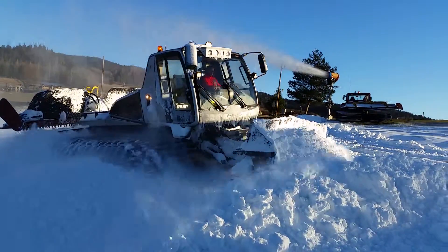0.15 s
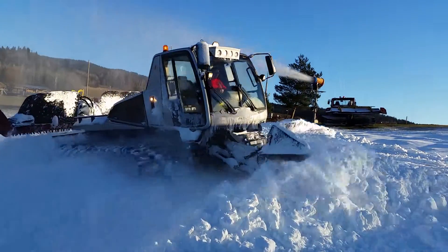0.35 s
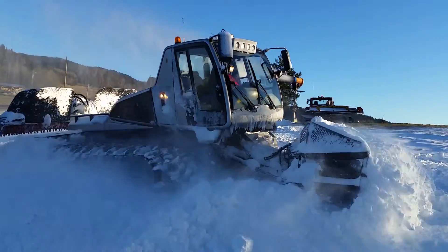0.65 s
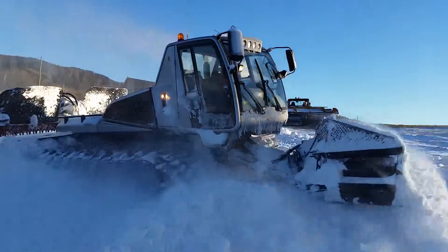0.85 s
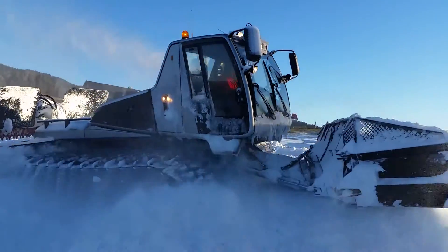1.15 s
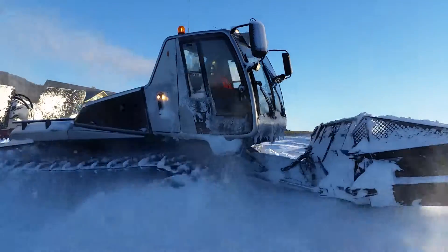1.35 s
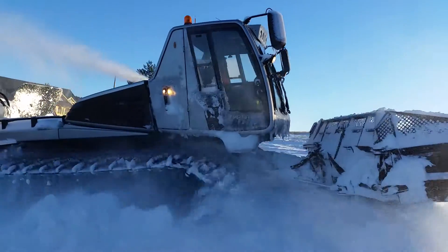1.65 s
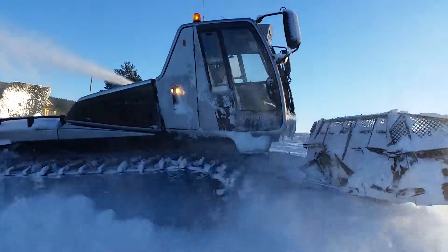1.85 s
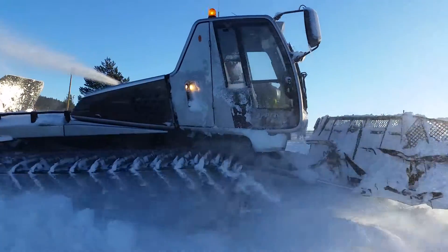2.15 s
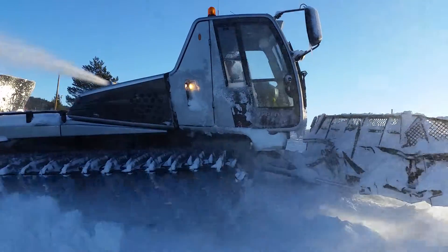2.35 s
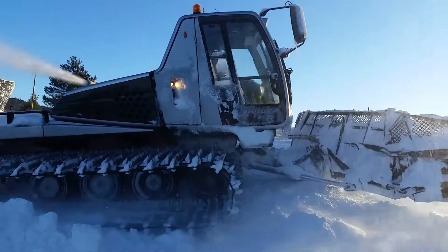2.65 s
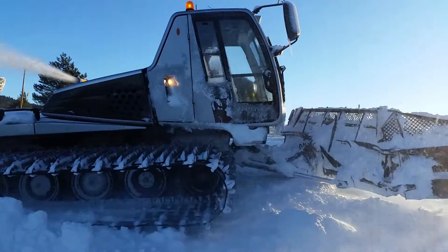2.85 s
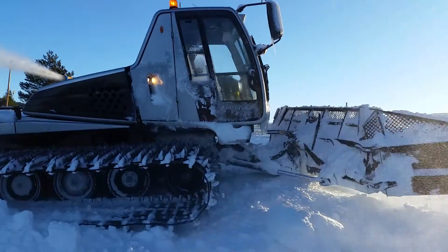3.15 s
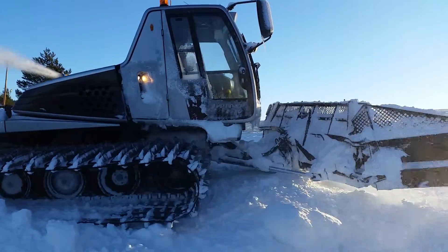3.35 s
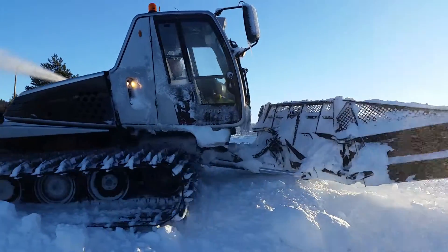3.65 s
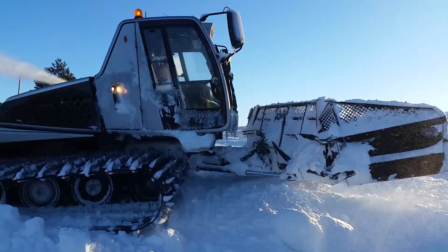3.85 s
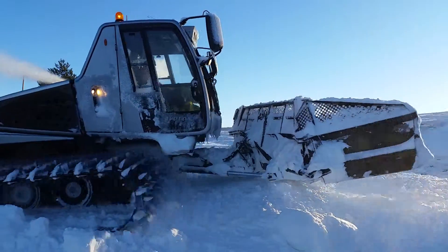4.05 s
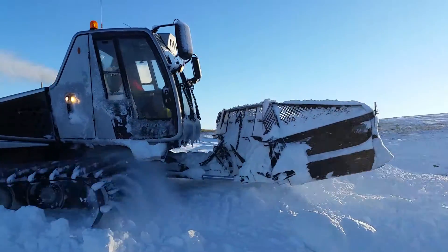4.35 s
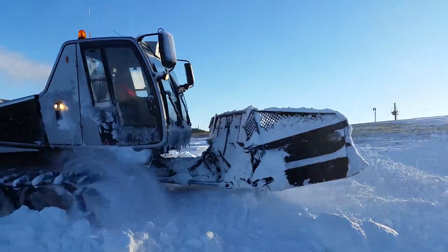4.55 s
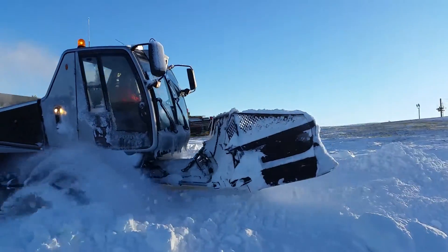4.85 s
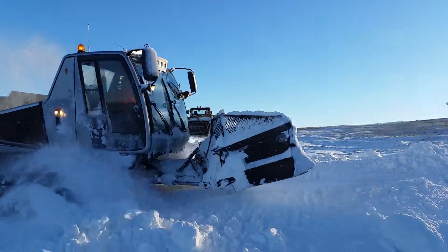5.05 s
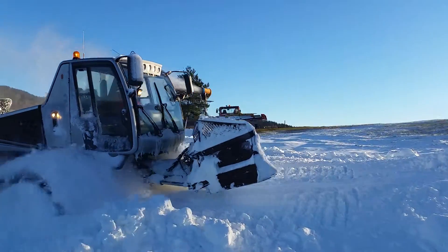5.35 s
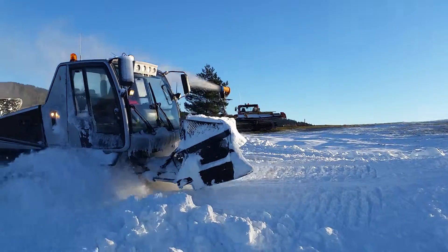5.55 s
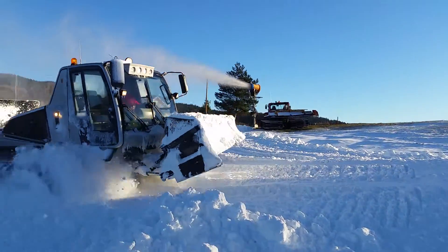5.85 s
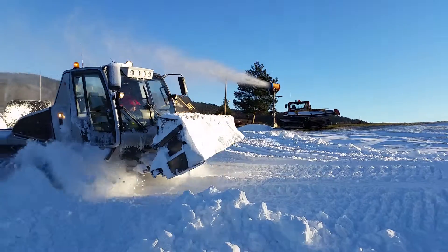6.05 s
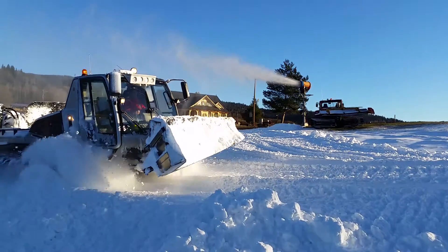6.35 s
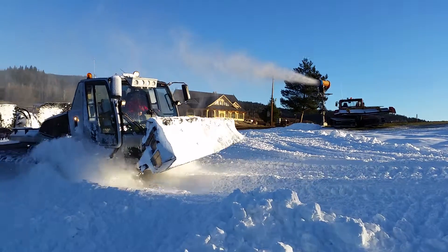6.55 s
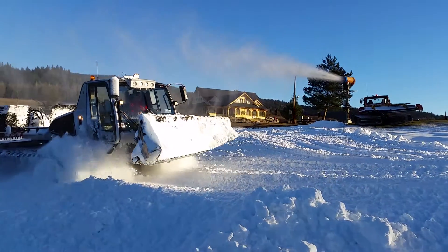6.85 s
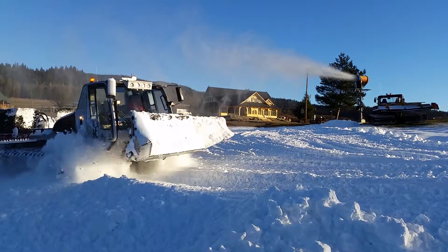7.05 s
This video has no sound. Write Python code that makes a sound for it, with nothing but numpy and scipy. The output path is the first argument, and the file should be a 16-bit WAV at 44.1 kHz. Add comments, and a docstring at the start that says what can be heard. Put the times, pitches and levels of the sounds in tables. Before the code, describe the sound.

A big diesel groomer swings past very near, clattering its tracks and throwing hissing snow. The engine bogs down, surges into one rising roar with whining pumps, then eases back. A brief quieter lull follows before the track noise returns brighter with crunching snow and squeaks. A distant snow gun drones in open air, and low wind bursts buffet and overload the unprotected stereo microphone.

```python
"""A snow groomer swings past close to the listener on a windy slope while a fan snow gun hums farther off.
Its six-cylinder diesel, a sum of firing orders and throbbing noise, sags, revs once and settles.
The turbo and pumps are tones; the steel tracks rattle as filtered noise, ring and squeak; thrown snow hisses.
Low-frequency noise buffets the two microphone ports as gusts, and the strongest make a limiter duck."""
import sys
import numpy as np
from scipy import signal
from scipy.fft import rfft, irfft
from scipy.io import wavfile
from scipy.ndimage import uniform_filter1d, map_coordinates

SR = 44100
rng = np.random.default_rng(int(sys.argv[2]) if len(sys.argv) > 2 else 0)


def wav_out(sig):
    """Save sig, one row per channel (or a flat mono array), as 16-bit PCM at SR to the path in sys.argv[1]."""
    wavfile.write(sys.argv[1], SR, np.round(np.clip(np.atleast_2d(sig).T, -1, 1) * 32767).astype(np.int16))


N = 316638
TIME = np.arange(N) / SR
BINS = np.fft.rfftfreq(N, 1 / SR)


def gain_of(db):
    """Level definition: decibels to an amplitude ratio."""
    return 10 ** (np.asarray(db) / 20)


def evened(x):
    """Energy normalisation: scales to rms 1."""
    return x / np.sqrt(np.mean(x ** 2) + 1e-20)


def read(points, hz):
    """Spectral interpolation on a log-frequency axis."""
    f, value = np.transpose(points)
    return np.interp(np.log(hz + 1), np.log(f + 1), value)


def played(rows):
    """Linear interpolation: each column of a curve table, sample by sample."""
    s, *columns = np.transpose(rows)
    return [np.interp(TIME, s, column) for column in columns]


def drift(rate_hz, size=16384):
    """Low-pass filtered noise: a smooth random curve of rms 1, varying up to about the given rate."""
    coarse = np.linspace(0, TIME[-1], size)
    rates = np.fft.rfftfreq(size, coarse[1])
    smooth = irfft(rfft(rng.standard_normal(size)) / (1 + (rates / rate_hz) ** 4))
    return np.interp(TIME, coarse, evened(smooth))


def panned(pan_db):
    """Interchannel level difference: left and right gains whose mean is 1."""
    sides = gain_of(np.array([[.5], [-.5]]) * pan_db)
    return sides / sides.mean(0)


def burst(s, length):
    """Gaussian envelope centred on s; its length is taken between the 1/e points."""
    return np.exp(-np.minimum((2 * (TIME - s) / length) ** 2, 20))


def noise():
    """Statistical independence: two unrelated white noises."""
    return rng.standard_normal((2, N))


def grains(per_s, spread_db):
    """Random impulse process: sparse clicks of uneven size on two channels."""
    size = gain_of(spread_db * np.minimum(rng.exponential(1, N), 4))
    return evened(noise() * size * (rng.random(N) < per_s / SR))


def tone(turns):
    """Phase accumulation: a sine of rms 1 from its count of cycles, with a random starting phase."""
    return np.sqrt(2) * np.sin(2 * np.pi * (turns + rng.random()))


def delayed(x, ms):
    """Propagation delay: shifts a signal later by a curve."""
    return map_coordinates(x, [np.arange(N) - ms * SR / 1000], order=5)


# Unlike responses of the two ports. Each row: frequency in Hz, left minus right in dB.
PORTS = [(60, -13), (140, 3.5), (300, 0), (600, 4), (1000, 5.5), (1400, 7.5), (1700, 9.5), (2300, 9.5),
         (2900, 8.5), (3650, 1), (4500, 5), (5600, 3), (6100, 5), (7300, 8.5), (8300, 29), (9000, 16.5),
         (9450, 28), (10200, 25), (11200, 6.5), (12500, 3.5), (15000, -4)]
# Likeness of the two ports' signals. Each row: frequency in Hz, left-right correlation (no unit).
LIKENESS = [(30, 0.45), (130, 1), (600, 0.69), (1000, 0.46), (1600, 0.76), (3000, 0.71), (6000, 0.065)]


def coloured(drive, spectrum):
    """Linear filtering with partial coherence: shapes a two-channel drive for both ports; mid rms 1."""
    a, b = rfft(drive)
    same = np.clip(read(LIKENESS, BINS), -1, 1)
    pair = np.array([a, same * a + np.sqrt(1 - same ** 2) * b])
    sides = panned(read(PORTS, BINS))
    mid = np.sqrt((sides ** 2).sum(0) + 2 * same * sides.prod(0))
    out = irfft(pair * sides / mid * gain_of(read(spectrum, BINS)), N)
    return out / np.std(out.mean(0))


# Loudness of the groomer, which engine, tracks and snow all follow.
# Each row: time in seconds, level in dB before each layer's own level, left minus right in dB.
MACHINE = [(0, -39, 8), (.1, -32.5, 3), (.35, -39.5, 9.5), (1.05, -37.5, 5), (1.5, -30, 5.5),
           (2.3, -30, 4.5), (3.3, -29, 7), (3.6, -30.5, 7), (4.1, -39, 3.5), (4.45, -38.5, 6),
           (4.85, -30.5, 5.5), (5.2, -30, 6), (5.9, -32, 1.5), (6.25, -33, 7), (6.85, -34, 5.5)]


def groomer_db(follow=1):
    """Common level envelope: a layer may follow the groomer's swings more or less strongly."""
    db = played(MACHINE)[0]
    return db.mean() + follow * (db - db.mean())


# Engine speed, sagging under the load, revving once and settling.
# Each row: time in seconds, firing rate in Hz.
ENGINE = [(0, 138.6), (.6, 135.5), (.95, 131.3), (1.4, 133.1), (1.65, 126), (2.15, 102), (2.28, 103),
          (2.45, 129.5), (2.7, 152), (3, 168.5), (3.3, 173.5), (3.6, 167.9), (3.9, 156), (4.3, 141),
          (5, 131.2), (5.6, 126.4), (6.3, 130.2), (7.18, 128.5)]


def crank(jitter=0.0031):
    """Frequency integration: the nominal firing rate, and the count of firings with slightly unsteady speed."""
    hz = played(ENGINE)[0]
    return hz, np.cumsum(hz * (1 + jitter * drift(17.2))) / SR


def high_revs(hz, cruise_hz=135, span_hz=35):
    """Linear speed scale: 0 at cruising speed, 1 at the top of the rev."""
    return np.clip((hz - cruise_hz) / span_hz, 0, 1)


# Orders of the exhaust before the pipe. Each row: multiple of the firing rate, relative level in dB.
EXHAUST = [(1, 0.5), (1.5, -16), (2, -6), (3, -7.5)]
# Resonances of pipe and silencer. Each row: frequency in Hz, gain in dB.
PIPE = [(100, -10), (118, -7), (129, 0), (141, -0.5), (156, 2), (163, 1), (172, -8), (200, -5.5),
        (260, -11), (520, -19)]
# The note grows by up to PULL_DB when the engine gains speed about this fast, after the turbo's lag.
PULL_DB, PULL_HZ_PER_S, BOOST_LAG_S = 5, 46, 0.25


def exhaust(hz, turns, level_db=9.5, follow=0.75, rough=0.13, thrum_db=-34):
    """Source-filter principle: firing orders sweep the pipe's resonances and swell when the engine pulls.

    The two manifold halves thrum an octave below the firing rate.
    """
    gaining = uniform_filter1d(np.gradient(hz) * SR, size=SR // 8)
    boost = np.interp(TIME - BOOST_LAG_S, TIME, np.maximum(gaining, 0))
    pull_db = PULL_DB * np.tanh(boost / PULL_HZ_PER_S)
    note = 0
    for k, db in EXHAUST:
        roughness = 1 + rough * drift(45)
        note = note + gain_of(db + read(PIPE, k * hz)) * tone(k * turns) * roughness
    thrum = gain_of(thrum_db) * tone(turns / 2) * (1 + 0.42 * drift(9.2))
    return (gain_of(groomer_db(follow) + level_db + pull_db) * note + thrum) * panned(-0.9)


# Spectrum of the combustion noise. Each row: frequency in Hz, relative level in dB.
ROAR = [(10, -45), (28, -7), (48, 3.5), (80, 1), (140, 7), (230, -0.5), (350, -2.5), (500, -0.5), (690, -4),
        (820, -9), (1100, -13.5), (2500, -56)]
# Spectrum of the intake roar. Each row: frequency in Hz, relative level in dB.
INTAKE = [(200, -36), (520, -6), (680, 12), (770, 2.5), (860, -29), (1400, -39)]


def engine_bay(hz, turns, roar_db=8, intake_db=2.5, orders_db=-4, knock=0.19, follow=0.84):
    """Amplitude modulation: combustion noise throbs with the firing and the intake roars at high revs.

    Unequal cylinders fill in the orders at sixths of the firing rate.
    """
    throb = 1 + knock * np.cos(2 * np.pi * turns)
    combustion = gain_of(roar_db) * coloured(noise() * throb, ROAR)
    intake = gain_of(intake_db) * high_revs(hz) * coloured(noise() * throb, INTAKE)
    orders = evened(sum(tone(k / 6 * turns) * (1 + .6 * drift(6)) / np.sqrt(k) for k in range(10, 66)))
    return gain_of(groomer_db(follow)) * (combustion + intake + gain_of(orders_db) * orders * panned(2.9))


# Gears and hydraulic pumps. Each row: multiple of the firing rate, relative level in dB when cruising,
# relative level in dB at full revs.
WHINES = [(2.31, -10, -4), (3.12, -11.5, -31), (4, -14, -7.5), (4.6, -8.5, -11)]


def pumps(hz, turns, level_db=2.5, follow=0.8, waver=0.26):
    """Meshing orders: gears and hydraulic pumps whine at fixed multiples of the firing rate."""
    revs = high_revs(hz)
    whine = 0
    for k, cruise_db, full_db in WHINES:
        db = cruise_db + revs * (full_db - cruise_db)
        whine = whine + gain_of(db) * tone(k * turns) * (1 + waver * drift(13))
    return whine * gain_of(groomer_db(follow) + level_db) * panned(3.8)


# The turbo runs down, then spools up a little with the rev.
# Each row: time in seconds, mean whistle frequency in Hz, relative level in dB.
TURBO = [(0, 10540, -47), (1, 10140, -46), (1.3, 9940, -35), (1.47, 9730, -41), (1.67, 9150, -34),
         (1.82, 8500, -31.5), (1.95, 7800, -46), (2.29, 6652, -54), (2.55, 7100, -53), (2.75, 7493, -50),
         (3.3, 7170, -49), (3.7, 7040, -80)]


def turbo(level_db=-1.0, waver=0.006, fuzz=0.97):
    """Narrow-band modulation: a whistle, fuzzy with random sidebands, sinks as the boost falls away."""
    hz, db = played(TURBO)
    turns = np.cumsum(hz * (1 + waver * drift(156))) / SR
    sidebands = drift(150) * tone(turns) + drift(60) * tone(turns)
    whistle = evened(tone(turns) + fuzz * sidebands)
    return whistle * gain_of(db + level_db) * panned(20)


# Rattle with the flank facing the listener. Each row: frequency in Hz, relative level in dB.
RATTLE_FLANK = [(480, -11), (820, -1.5), (893, -29), (964, 4), (1040, -3.5), (1190, 1.5), (1450, -6),
                (1680, 0), (2010, -11), (2620, -15), (2970, -13.5), (3800, -9.5), (4600, -15),
                (5680, -28.5), (8000, -18.5), (10400, -53), (17600, -120)]
# Rattle with the blade facing the listener. Each row: frequency in Hz, relative level in dB.
RATTLE_FRONT = [(480, -25), (820, -17), (960, -6.5), (1150, -0.5), (1350, 0), (1500, -2), (1780, -1.5),
                (2300, -5.5), (2700, -15.5), (3150, -14.5), (3650, -13), (4700, -15.5), (5500, -19),
                (6500, -28), (8000, -16), (10400, -48)]
# Turning of the groomer. Each row: time in seconds, share of the flank from 0 to 1.
HEADING = [(0, 0.25), (.8, 0.8), (1.5, 0.86), (3.5, 1), (4.5, 0.03), (7.18, 0.05)]


def tracks(turns, level_db=-0.16, clink=0.41, knock=0.069, shake_db=0.97, cleat_hz=22.84, slap=0.1):
    """Directivity: chain clinks and injector clatter change colour with heading and swell with each cleat."""
    rattle_db, pan_db = played(MACHINE)
    flank = np.clip(played(HEADING)[0], 0, 1)
    cleat_turns = np.cumsum(cleat_hz * (1 + 0.059 * drift(1.62))) / SR
    cleats = 1 + slap * np.cos(2 * np.pi * cleat_turns)
    clatter = 1 + knock * np.cos(2 * np.pi * turns)
    drive = (noise() + clink * grains(900, 2.8)) * clatter * cleats
    rattle = flank * coloured(drive, RATTLE_FLANK) + (1 - flank) * coloured(drive, RATTLE_FRONT)
    # only the pan's swings about its mean are applied
    return rattle * gain_of(rattle_db + level_db + shake_db * drift(11.6)) * panned(pan_db - pan_db.mean())


# Ringing of the cleats and wheels.
# Each row: frequency in Hz, relative level in dB, time to decay by 60 dB in seconds.
STEEL = [(1127, -3, 0.022), (1318, -5.5, 0.036), (1626, 1.5, 0.042), (1797, 0, 0.055), (2026, -2.5, 0.032),
         (2287, -6, 0.019), (3697, -8, 0.05), (4680, -17, .02)]


def clanks(level_db=-6, per_s=260):
    """Modal synthesis: cleats and wheels knock together and their steel modes ring briefly."""
    t = np.arange(SR // 10) / SR
    rings = np.zeros((2, N))
    for hz, db, t60 in STEEL:
        ring = evened(gain_of(-60 * t / t60) * np.sin(2 * np.pi * hz * t))
        rings += gain_of(db) * signal.oaconvolve(grains(per_s, 0.53), ring[None], axes=1)[:, :N]
    return evened(rings) * gain_of(groomer_db() + level_db) * panned(3.6)


# Squeaks of the steel track links.
# Each row: centre in seconds, length in seconds, mean pitch in Hz, level in dB.
SQUEAKS = [(2.369, 0.034, 10050, -34), (4.56, 0.029, 9080, -40), (4.62, .03, 9050, -42),
           (4.716, .05, 9000, -40), (4.941, .03, 8400, -39), (4.981, .03, 9030, -37),
           (5.34, 0.062, 8800, -37), (5.71, 0.036, 9000, -38), (5.79, 0.02, 9700, -32)]
# The links scrape as the tracks skid through the turn: centre, length, mean pitch and central level.
SKID_S, SKID_LENGTH_S, SKID_HZ, SKID_DB = 4.9, 0.85, 8850, -43.5


def squeaks(rasp_hz=170, scrape_hz=380, stutter_db=3):
    """Frictional squeal: short frequency-modulated cries of cold steel over a stuttering scrape."""
    sound = sum(gain_of(db) * burst(s, length) * np.sin(2 * np.pi * hz * TIME)
                for s, length, hz, db in SQUEAKS)
    rasp = np.exp(2j * np.pi * np.cumsum(rasp_hz * drift(388)) / SR)
    squeals = np.sqrt(2) * (signal.hilbert(sound) * rasp).real
    scrape = drift(300) * tone(np.cumsum(SKID_HZ + scrape_hz * drift(299)) / SR)
    scrape = scrape * burst(SKID_S, SKID_LENGTH_S) * gain_of(SKID_DB + stutter_db * drift(25))
    return (squeals + scrape) * panned(23)


# Spectrum of the powder hiss. Each row: frequency in Hz, relative level in dB.
POWDER = [(6000, -50), (9000, -7), (11000, -8.5), (12500, -2), (15000, 3), (16000, 1)]
# Crunch of snow under the cleats. Each row: frequency in Hz, relative level in dB.
CRYSTALS = [(2800, -18), (4000, -8.5), (5600, -13), (7500, -13), (8600, 0), (9400, -0.5), (10000, -1),
            (11200, -5), (13000, -6), (16000, -30)]
# Spectrum of a bursting clod. Each row: frequency in Hz, relative level in dB.
CLOD = [(500, -8), (2000, 9), (3000, -11), (6000, 4), (9000, 5), (15000, -7)]
# Clods of snow bursting on the tracks. Each row: centre in seconds, peak level in dB.
CLODS = [(4.935, -41), (5.03, -33), (5.075, -37), (5.125, -36), (5.31, -36)]
# Plumes of powder thrown up by the tracks.
# Each row: centre in seconds, length in seconds, relative level in dB, left minus right in dB.
PLUMES = [(.08, .12, -36, -2), (2.42, 0.55, -30, 2), (3.33, .08, -29, 14), (5.45, 0.32, -35, -1),
          (6.49, 0.43, -27, -5), (7.05, 0.23, -35, -13)]
# Late in the turn the hiss also bounces off the snow.
# Each row: time in seconds, delay in milliseconds, strength as an amplitude ratio.
BOUNCE = [(4.7, .25, 0), (5.45, .287, 0.02), (6.1, 0.31, 0.046), (6.6, 0.3, 0.12), (7.18, 0.36, 0.098)]


def snow(spray_db=-2.5, spray_follow=0.75, plume_db=-1.0, front_pan_db=-1.0, flank_pan_db=1.5,
         crunch_db=-7.0, crunch_follow=1.07, clump_db=0.8, billow_db=1.5, grit=0.14):
    """Granular noise and comb filtering: powder hisses, crystals crunch and clods burst, with a late echo."""
    delay_ms, strength = played(BOUNCE)
    pan_db = front_pan_db + (flank_pan_db - front_pan_db) * played(HEADING)[0]
    steady = gain_of(groomer_db(spray_follow) + spray_db) * panned(pan_db)
    plumes = sum(gain_of(db + plume_db) * burst(s, length) * panned(pan) for s, length, db, pan in PLUMES)
    powder = coloured(noise() + grit * grains(2500, 2.5), POWDER) * np.hypot(steady, plumes)
    crunch = coloured(noise() + grit * grains(1200, 3), CRYSTALS)
    crunch = crunch * gain_of(groomer_db(crunch_follow) + crunch_db)
    clods = coloured(noise(), CLOD) * sum(gain_of(db) * burst(s, 0.03) for s, db in CLODS)
    billowing = gain_of(billow_db * drift(7)) * powder + gain_of(billow_db * drift(15)) * crunch
    hiss = gain_of(clump_db * drift(40)) * billowing
    echo = strength * np.array([delayed(side, delay_ms) for side in hiss])
    return hiss + echo + clods


# Blade tone of the snow gun, fading around 4.3 seconds and then returning stronger.
# Each row: time in seconds, relative level in dB, left minus right in dB.
FAN = [(0, -32, 12), (1, -34, 13), (1.42, -28, 8), (2.4, -27.5, 6), (3.1, -31, -1), (3.6, -30.5, 1),
       (4.3, -38, 4), (5.1, -27.5, 3), (6, -27.5, 9.5), (6.85, -25.5, 9.5)]
# Motor and compressor of the snow gun. Each row: mean frequency in Hz, mean level in dB.
HUMS = [(404, -44), (939, -52), (990.5, -52.5), (1323, -51.5), (8600, -63), (9949, -66)]
FAN_HZ, BEAT_HZ = 745.1, 10.5  # mean blade tone, and how far below it a weaker tone beats against it


def snow_gun(blade_db=-1, beat_db=-11, flicker_db=0.63):
    """Beating: two close blade tones interfere above steady hums, all wavering in the moving air."""
    db, pan_db = played(FAN)
    clock = np.cumsum(1 + .0008 * drift(8)) / SR
    blades = tone(FAN_HZ * clock) + gain_of(beat_db) * tone((FAN_HZ - BEAT_HZ) * clock)
    hums = sum(tone(hz * clock) * gain_of(hum_db + 2 * drift(0.58)) * panned(read(PORTS, hz))
               for hz, hum_db in HUMS)
    return blades * gain_of(db + blade_db + flicker_db * drift(10)) * panned(pan_db) + hums


# The breeze, with a lull after the rev.
# Each row: time in seconds, relative rumble level in dB, left minus right in dB.
WIND = [(0, -19, -2), (.4, -23.5, -4), (.65, -26, 3), (1, -28.5, -2), (1.5, -21.5, 2), (2.2, -24, -3),
        (2.8, -20.5, -4), (3.25, -25.5, 10), (3.9, -27.5, 10), (4.1, -41, 14), (4.5, -40, 0),
        (5.05, -21.5, 2), (5.8, -19.5, -3.5), (6.35, -23, -2), (7.18, -21, 0)]
# Spectrum of the rumble. Each row: frequency in Hz, relative level in dB.
RUMBLE = [(8, -45), (18, -15), (28, -14), (45, -8), (65, 0.5), (85, -2.5), (120, -2.5), (200, -8.5),
          (400, -23), (1000, -54), (3000, -92)]
# Sharp gusts, mostly on one port. Each row: centre in seconds, length in seconds,
# relative rumble level in dB, relative flutter level in dB, left minus right in dB.
GUSTS = [(.02, 0.052, -24, -16.5, -7), (0.178, 0.082, -10.5, -14.5, -11), (0.27, 0.095, -28, -13, -10),
         (2.11, 0.035, -15.5, -21, 12), (2.871, 0.082, -15, -15, 6), (3.068, 0.086, -28, -14.5, 28),
         (3.399, 0.14, -18.5, -20, 14), (3.65, 0.089, -17.5, -27, 27), (3.79, 0.032, -12, -13.5, 3.5),
         (3.84, 0.076, -21, -21, 26), (5.62, 0.11, -21.5, -26, -10), (5.882, 0.068, -19.5, -17, -13),
         (5.964, 0.036, -19, -11, -3), (6.036, 0.043, -12, -25, 6), (6.13, 0.05, -16.5, -20.5, 16),
         (6.967, 0.086, -11.5, -25, -25), (7.044, 0.12, -18, -16.5, -8)]
# Spectrum of the flutter. Each row: frequency in Hz, relative level in dB.
FLUTTER = [(10, -50), (40, -29), (100, -2), (200, 4), (350, -3.5), (600, -14), (1500, -51), (4000, -70)]


def wind(level_db=3, gust_db=0, flutter_db=0, shared=0.12, eddy_hz=22, chop=0.32, swell_db=0.74):
    """Turbulent pressure: eddies puff on two ports, partly together; sharp gusts reach higher in pitch."""
    db, pan_db = played(WIND)
    rumble, flutter = (evened(irfft(rfft(noise()) * gain_of(read(shape, BINS)), N))
                       for shape in (RUMBLE, FLUTTER))
    rumble = rumble + shared * rumble[::-1]  # each port also hears a little of the other
    rumble = rumble / np.sqrt(uniform_filter1d(rumble ** 2, size=SR // 10))  # removes its own slow swells
    swell = swell_db * np.array([drift(4.6), drift(11)])
    breeze = gain_of(db + level_db + swell) * panned(pan_db)
    gusts = 0
    for s, length, low, high, pan in GUSTS:
        push = gain_of(low + gust_db) * rumble + gain_of(high + flutter_db) * flutter
        gusts = gusts + burst(s, length) * panned(pan) * push
    eddy_turns = np.cumsum(eddy_hz * (1 + 0.163 * drift(4.0))) / SR
    puffs = 1 + chop * np.cos(2 * np.pi * eddy_turns)
    return puffs * (breeze * rumble + gusts)


# Bearing of the machines as the pair of ports turns.
# Each row: time in seconds, milliseconds by which sound reaches the right port after the left.
BEARING = [(0, 0.11), (3, 0.12), (3.9, 0.24), (4.6, 0.3), (6.5, 0.24), (7.18, 0.29)]


def scene():
    """Superposition: groomer, snow gun and wind add in open air; most machine sound reaches the right later."""
    hz, turns = crank()
    engine = exhaust(hz, turns) + engine_bay(hz, turns) + pumps(hz, turns)
    left, right = engine + tracks(turns) + clanks() + snow_gun()
    machines = np.array([left, delayed(right, played(BEARING)[0])])
    return machines + turbo() + squeaks() + snow() + wind()


# Limiter: threshold, release of the held excess, share of that excess removed; then the band limit.
CEILING_DB, RECOVER_DB_PER_S, SQUEEZE = -11, 49, 0.68
EDGE_HZ = 15800


def record(dry):
    """Dynamic compression: a limiter ducks strong gusts and rounds off peaks; then a low-pass filter."""
    power = uniform_filter1d(dry ** 2, size=SR // 40).max(0)
    over_db = np.maximum(10 * np.log10(abs(power) + 1e-12) - CEILING_DB, 0)
    release = RECOVER_DB_PER_S * TIME
    held_db = np.maximum.accumulate(over_db + release) - release  # rises at once, falls steadily
    ducked = dry * gain_of(-SQUEEZE * uniform_filter1d(held_db, size=SR // 45))
    rounded = ducked / (1 + ducked ** 6) ** (1 / 6)
    low_pass = signal.firwin(801, EDGE_HZ, window=("kaiser", 9), fs=SR)
    return signal.oaconvolve(rounded, low_pass[None], "same")


dry = scene()
out = record(dry)
wav_out(out)
```